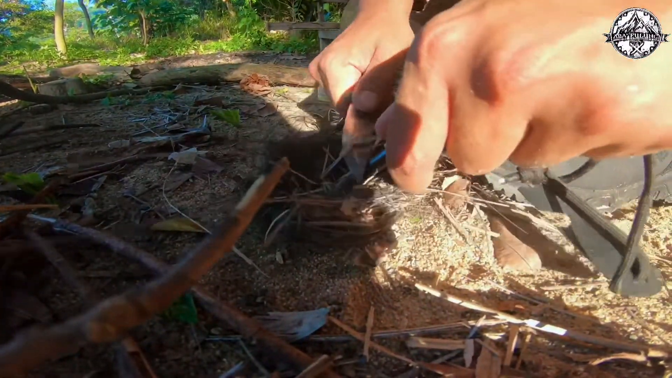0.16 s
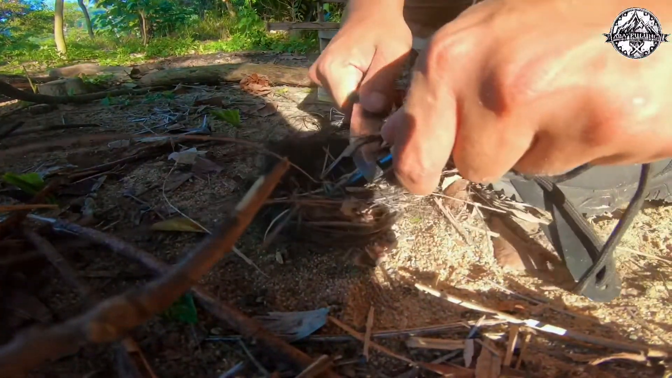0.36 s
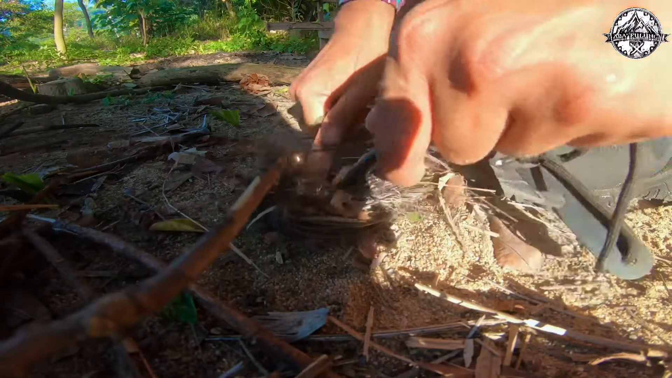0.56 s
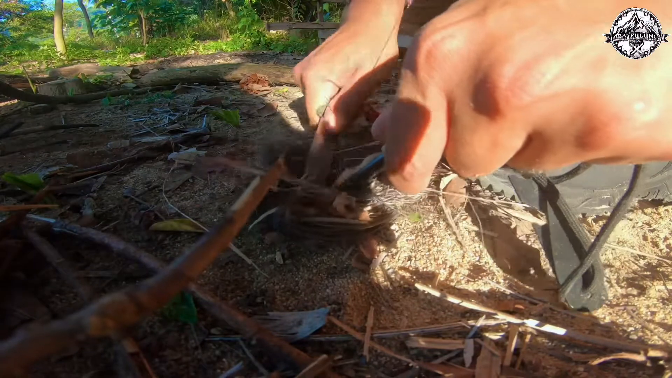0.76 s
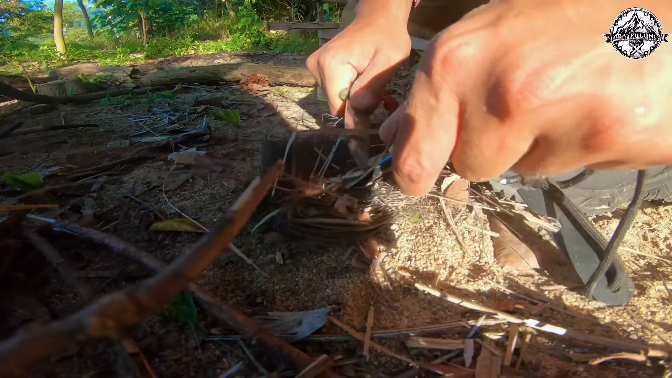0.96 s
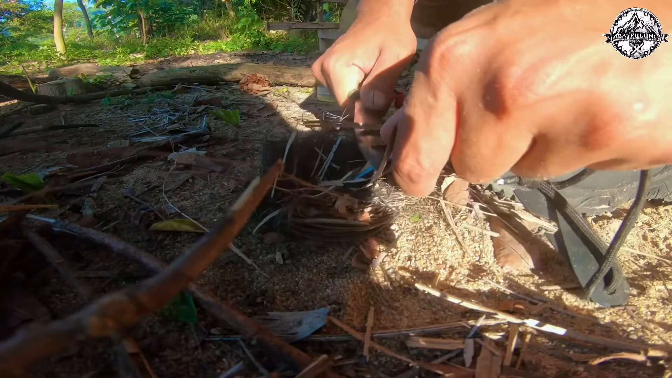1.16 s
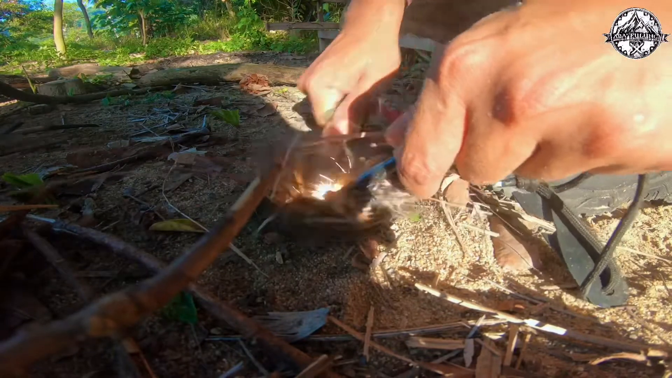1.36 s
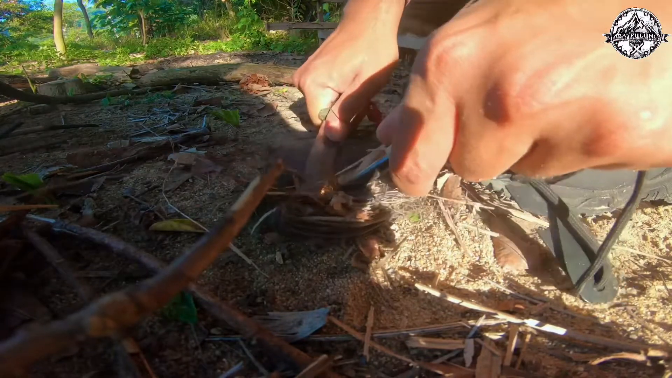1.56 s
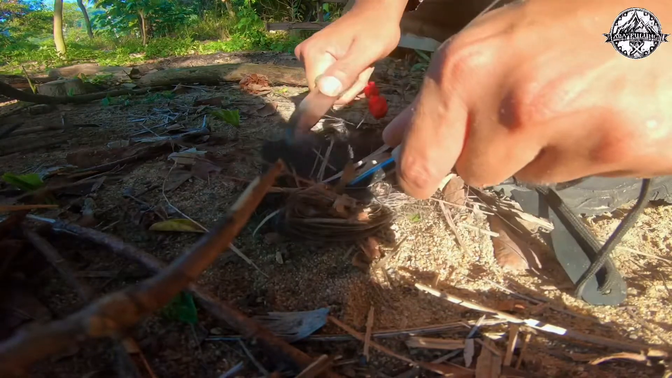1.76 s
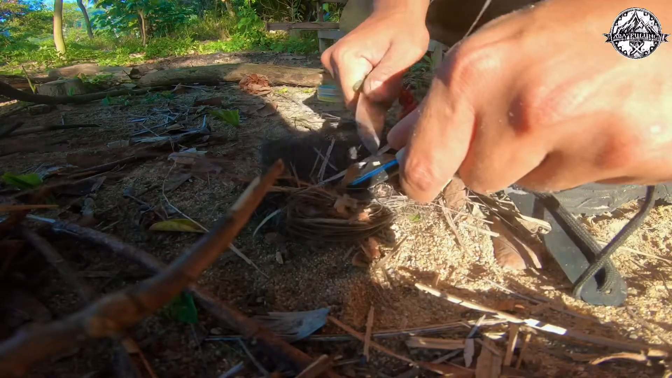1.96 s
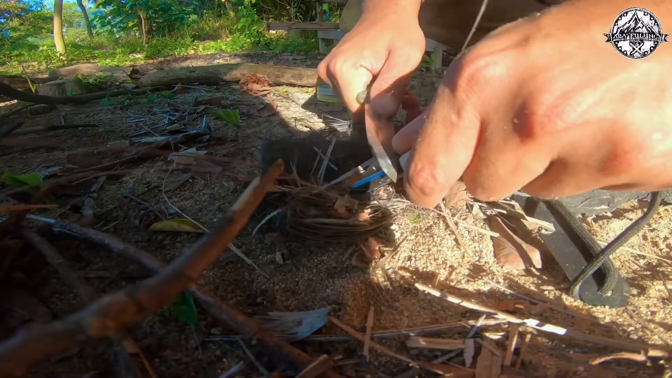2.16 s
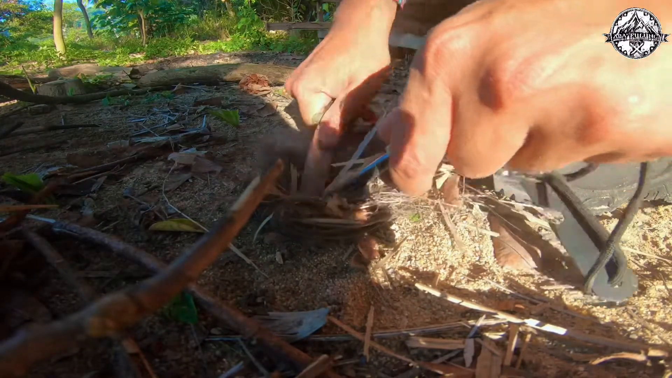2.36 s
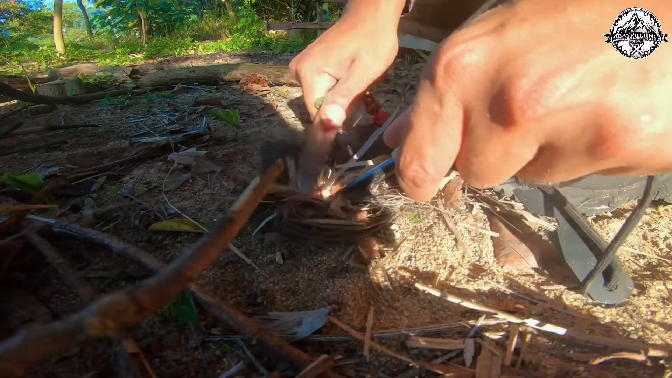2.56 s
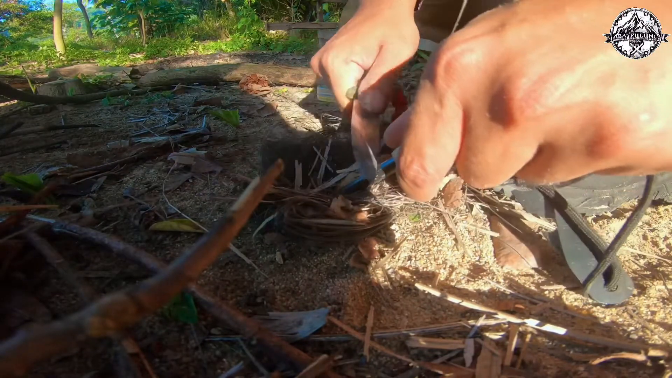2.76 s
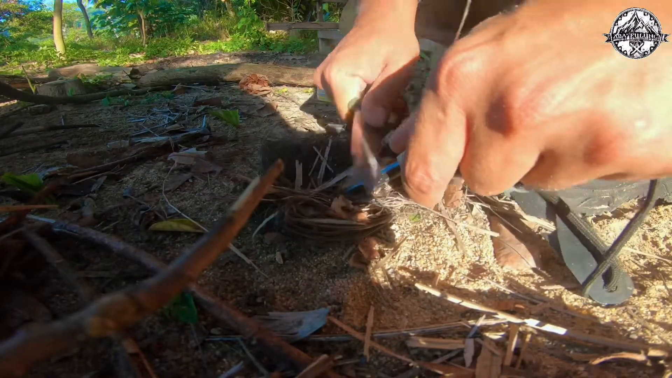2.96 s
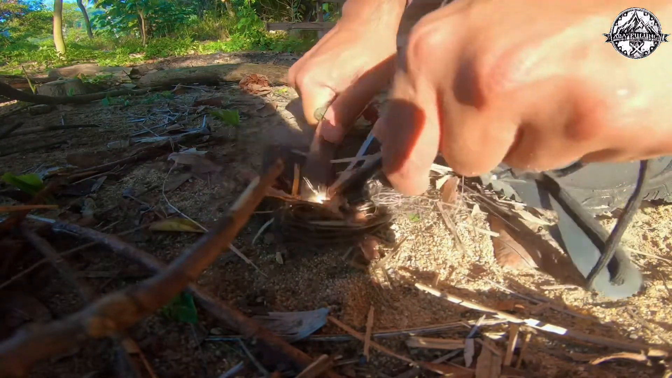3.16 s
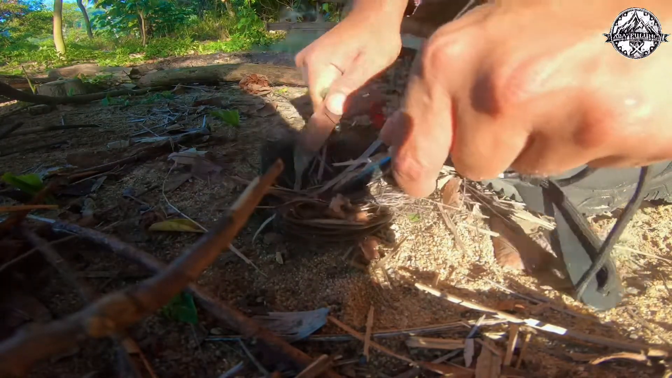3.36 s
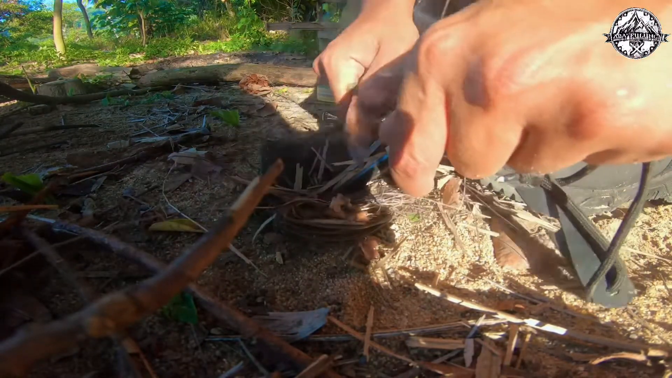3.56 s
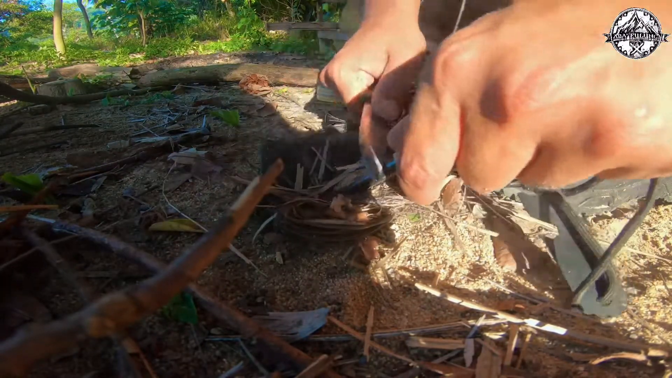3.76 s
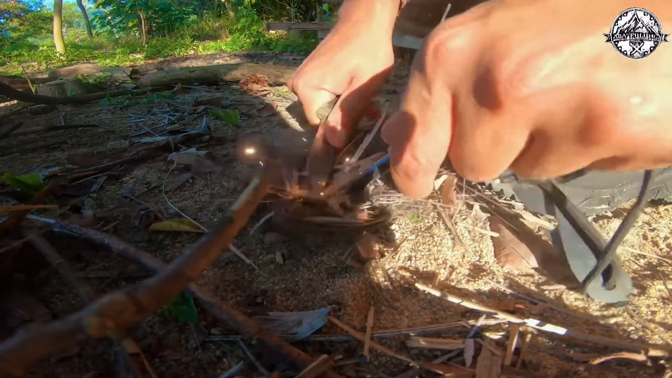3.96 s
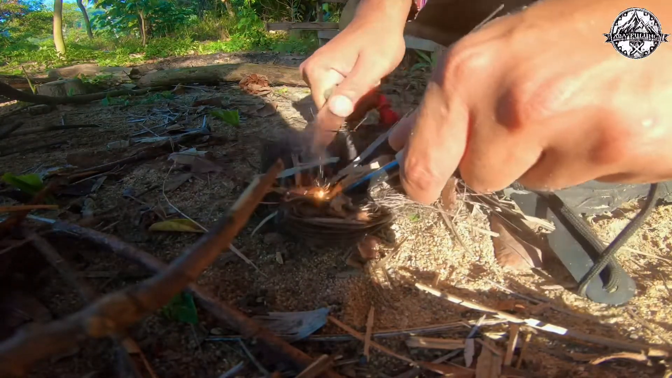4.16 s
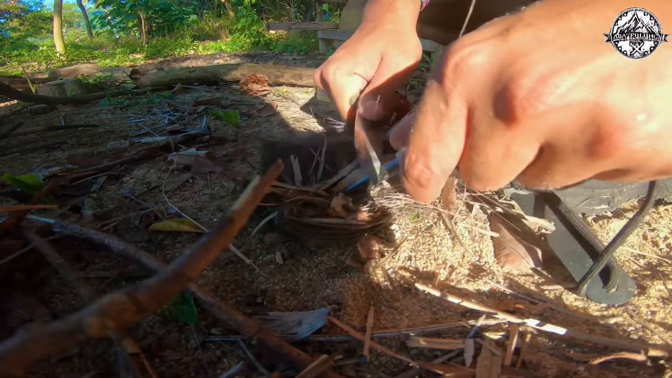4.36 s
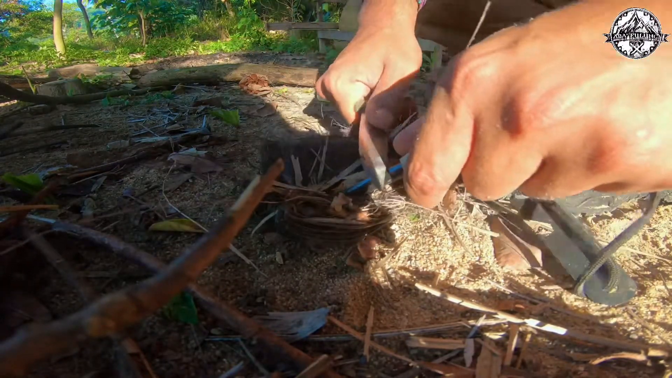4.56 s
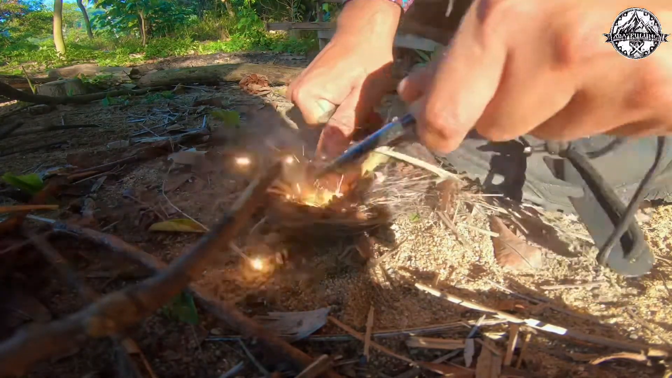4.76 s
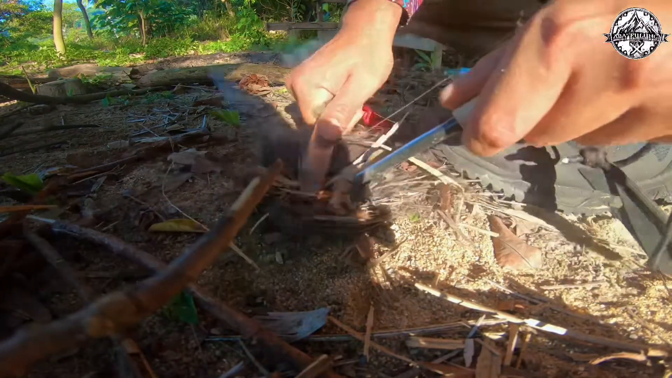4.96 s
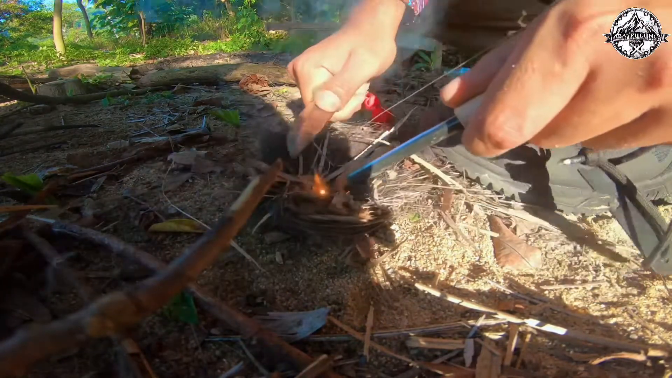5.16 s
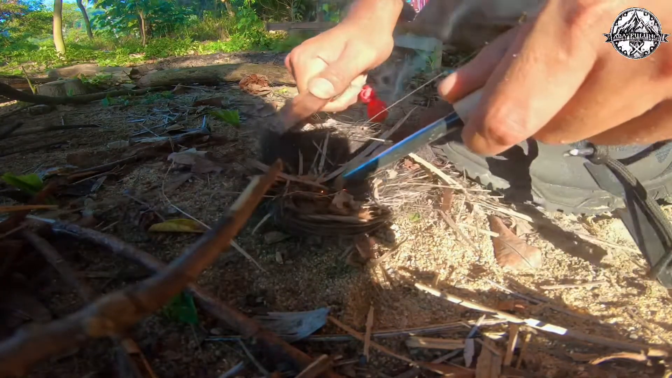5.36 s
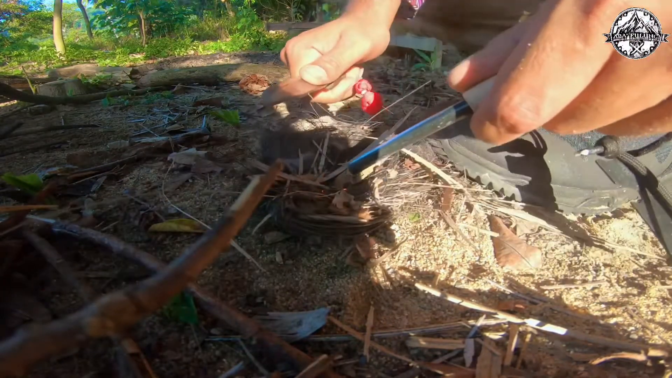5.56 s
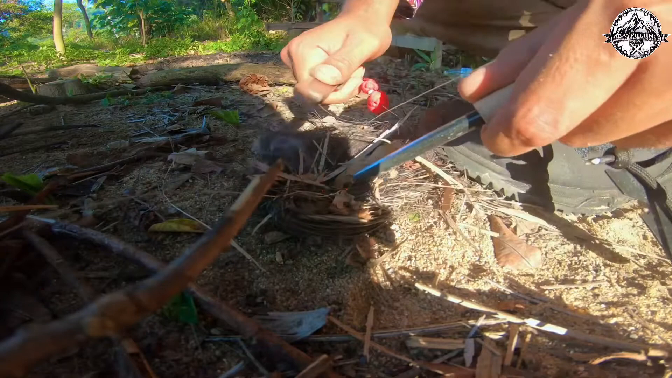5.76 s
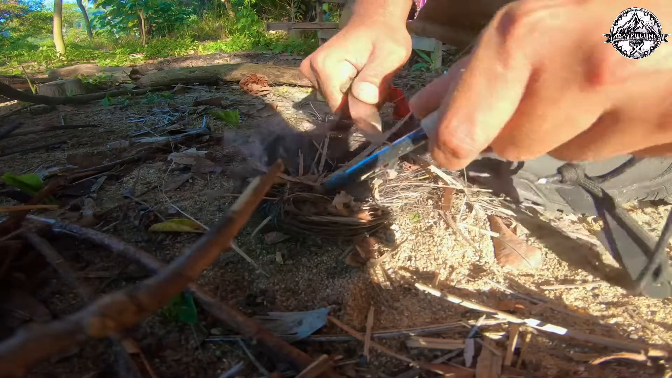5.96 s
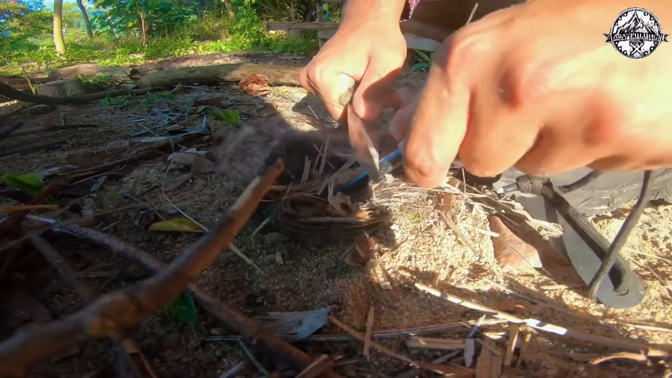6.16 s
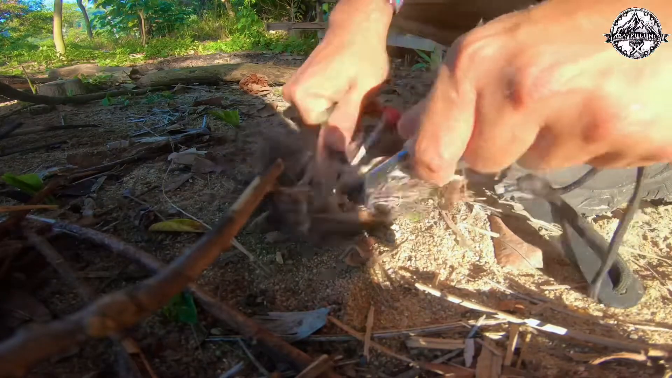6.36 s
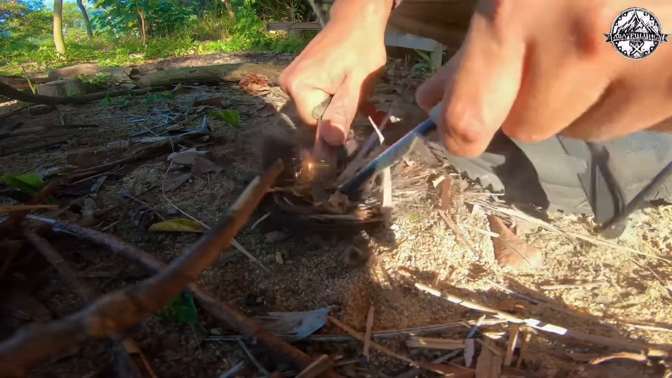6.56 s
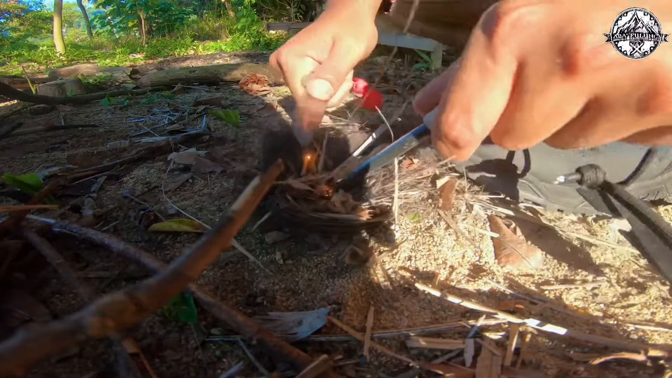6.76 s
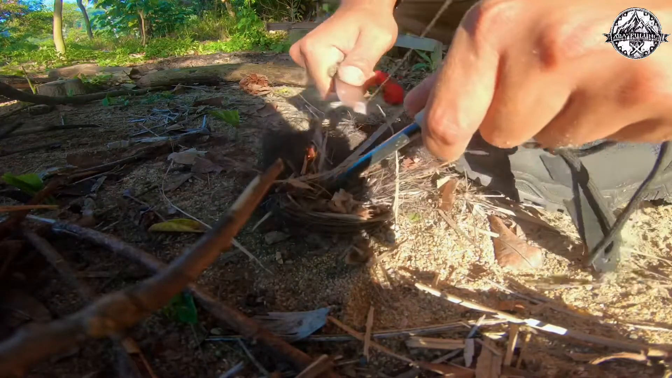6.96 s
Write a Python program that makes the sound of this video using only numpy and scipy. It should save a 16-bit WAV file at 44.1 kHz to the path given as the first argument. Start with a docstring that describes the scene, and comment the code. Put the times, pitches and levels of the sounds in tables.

```python
"""Scraping a ferro rod in a wood

A knife taps onto a ferro rod, rasps down it and bites with short squeals; the shavings spit and crackle.
Scrapes are trains of random fractures through a broad resonance; taps are damped steel modes,
squeals swept tones, bursts sharp clicks with debris, and knocks in the wood decaying sines.
Behind, tinder rustles in filtered fractures, a far engine drones in harmonic orders, one faint
tone whistles, and shaped noise gives the outdoor rumble and the hiss of insects."""
import sys
import numpy as np
from scipy import signal
from scipy.fft import rfft, irfft
from scipy.io import wavfile

SR = 44100
rng = np.random.default_rng(int(sys.argv[2]) if len(sys.argv) > 2 else 0)


def int16_out(signal):
    """Quantize to a 16-bit WAV file."""
    q = np.round(np.clip(np.atleast_2d(signal).T, -1, 1) * 32767)
    wavfile.write(sys.argv[1], SR, q.astype(np.int16))


N = 308700
TIME = np.arange(N) / SR  # seconds

# Sprays of shavings that rasp off and flare up: t/s, length/s, level/dB, body tilt/dB, fizz tilt/dB
FLARES = [(0.471, 0.037, -29, -2, -1.5), (0.554, 0.06, -32.5, -2.5, 2), (0.729, 0.03, -32, 2, 4),
          (0.767, 0.073, -28.5, -2, 3), (0.871, 0.048, -37, -2, 4), (1.353, 0.18, -35, 0.5, -1),
          (1.593, 0.016, -28, 0, 0), (1.638, 0.044, -35.5, 1, 3.5), (2.317, 0.016, -33, 1, 6),
          (2.427, 0.042, -35, 3, 7.5), (2.506, 0.0068, -24, 1.5, 5), (2.535, 0.039, -34, 0.5, -0.5),
          (2.98, 0.04, -23, 3.5, 4.5), (3.032, 0.099, -35.5, 4.5, 6.5), (3.79, 0.025, -27.5, 9.5, 4.5),
          (3.832, 0.051, -25.5, 2.5, 3.5), (3.909, 0.033, -29.5, 0.5, 3.5), (4.014, 0.017, -30.5, -6, -0.5),
          (4.038, 0.028, -25.5, 1.5, 0.5), (4.112, 0.028, -30.5, -0.5, -2), (4.623, 0.013, -23, 8, 2),
          (4.633, 0.059, -18, 2.5, 1.5), (4.723, 0.078, -31.5, 2.5, -1), (4.85, 0.061, -33.5, 0.5, -2),
          (4.942, 0.013, -31.5, -1, -0.5), (4.965, 0.075, -28.5, 3.5, 1), (5.058, 0.071, -40.5, 4, -3),
          (6.391, 0.023, -26, 2, 7), (6.427, 0.043, -30, -1.5, 2), (6.478, 0.051, -38.5, 7, 5),
          (6.574, 0.055, -27, -1, -2.5)]


def amp(db):
    """Level to amplitude: 20 dB is a factor of ten."""
    return 10 ** (np.asarray(db) / 20)


def unit(x):
    """Normalization of mean power: scales to rms 1."""
    return x / np.sqrt(np.mean(x ** 2) + 1e-20)


def read(points, hz):
    """Interpolation of a spectrum along a logarithmic frequency axis."""
    f, value = np.transpose(points)
    return np.interp(np.log(hz + 1), np.log(f + 1), value)


def bins(x):
    """Discrete Fourier analysis: the frequency of each bin of a sound, in Hz."""
    return np.fft.rfftfreq(x.shape[-1], 1 / SR)


def shaped(x, db):
    """Linear filtering as multiplication of the spectrum by a gain for each bin."""
    return irfft(rfft(x) * amp(db), x.shape[-1])


def add(mix, s, sound):
    """Superposition: adds a sound to the mix, in place, at a time in seconds."""
    part = mix[..., max(round(s * SR), 0):][..., :sound.shape[-1]]
    part += sound[..., :part.shape[-1]]


def wander(size, hz):
    """Low-pass noise: a smooth random course of rms 1 that hardly moves faster than hz."""
    noise = rng.standard_normal(size)
    return unit(irfft(rfft(noise) / (1 + (bins(noise) / hz) ** 4), size))


def air():
    """Interaural coherence: outdoor rumble, alike in both ears in the bass and mostly diffuse above."""
    # Spectrum of the rumble: f/Hz, density/dB (relative)
    rumble = [(13, -44.5), (22, -17.5), (86, -10), (134, -6.5), (169, -11), (241, -16.5), (305, -25),
              (661, -39), (1030, -41), (1400, -40), (1610, -37.5), (1730, -57.5), (2190, -52),
              (6000, -69.5), (7800, -92.5), (13200, -120)]
    # Likeness of the two ears: f/Hz, coherence (1 = identical)
    likeness = [(60, 0.89), (130, 0.96), (260, 0.95), (550, 0.26), (1200, 0.1), (2400, 0.4), (6000, 0.2)]
    left, other = shaped(rng.standard_normal((2, N)), read(rumble, bins(TIME)))
    same = np.clip(read(likeness, bins(TIME)), -1, 1)
    right = irfft(same * rfft(left) + np.sqrt(1 - same ** 2) * rfft(other), N)
    return amp(-40) * unit(np.array([left, right]))


def engine(hunt=0.01169, waver=0.55):
    """Harmonic orders of one shaft: a far drone, each order wavering on its way through the trees."""
    # Course of the drone: t/s, frequency of the sixth order before hunting f/Hz, level/dB
    course = [(0.0, 134, -37.5), (0.701, 144, -43.5), (2.401, 135, -38.5), (3.4, 136, -39.5),
              (4.0, 140, -33), (4.5, 141, -45.5), (5.6, 144, -35.5), (7.0, 140, -37.5)]
    # Orders: multiple of the shaft speed, level/dB (relative)
    orders = [(3, -33), (4, -8), (5, -4), (6, 5), (7, -11), (8, -31.5), (10, -12.5)]
    s, hz, db = np.transpose(course)
    hz = np.interp(TIME, s, hz) * (1 + hunt * wander(N, 2.445))  # hunt: rms share of the speed
    shaft = 2 * np.pi * np.cumsum(hz / 6) / SR
    drone = np.zeros(N)
    for multiple, order_db in orders:
        phase = multiple * shaft + rng.uniform(0, 2 * np.pi) + waver * wander(N, 8.5)
        drone += amp(order_db) * np.sin(phase) * (1 + 0.29 * wander(N, 6.1))
    return amp(np.interp(TIME, s, db)) * unit(drone)


def whistle(start_s=2.1, length_s=0.36, pitch_hz=1585, level_db=-59.5, waver=0.0053):
    """Frequency modulation: one faint, thin tone from far off, its pitch wavering slightly."""
    out, size = np.zeros(N), int(length_s * SR)
    phase = 2 * np.pi * np.cumsum(pitch_hz * (1 + waver * wander(size, 30))) / SR
    add(out, start_s, amp(level_db) * signal.windows.tukey(size, 0.3) * np.sin(phase))
    return out


def insects(start_db=-44.5, full_db=-39.5, swell_s=4.0, shimmer_db=0.6959, lean_db=0.3):
    """Incoherent summation: a diffuse chorus merges into one high, shimmering hiss that swells, then holds."""
    # Spectrum of the chorus: f/Hz, density/dB (relative)
    chorus = [(5500, -31), (7000, -24), (7800, -11.5), (8400, -5), (9300, -1), (9800, -3), (10200, -19),
              (10600, -33)]
    hiss = unit(shaped(rng.standard_normal((2, N)), read(chorus, bins(TIME))))
    db = np.interp(TIME, [0, swell_s], [start_db, full_db]) + shimmer_db * wander(N, 30)
    return hiss * amp([db + lean_db, db - lean_db])


def scatter(x, decay_s, db, size=16384):
    """Diffuse reflection: convolution with decaying noise, different for each ear."""
    t = np.arange(size) / SR
    tail = rng.standard_normal((2, size)) * np.exp(-t / decay_s) * (1 - np.exp(-2 * t / decay_s))
    return amp(db) * signal.oaconvolve(x[None], tail / np.linalg.norm(tail[0]), axes=1)[:, :N]


def hands(x, shared_db=-10, apart_db=-11, reach_s=0.0018, count=5, size=256):
    """Comb filtering: moving hands throw back close echoes, new for each sound, partly different for each ear."""
    x = np.pad(x, (0, size))
    delay = reach_s * rng.uniform(0.1, 1, (3, count, 1))
    sign = rng.choice([-1, 1], delay.shape)
    echoes = (sign * np.exp(-2j * np.pi * delay * bins(x))).sum(1) / np.sqrt(count)
    paths = 1 + amp(shared_db) * echoes[0] + amp(apart_db) * echoes[1:]
    heard = irfft(rfft(x) * paths, len(x))
    return heard * np.sqrt(np.mean(x ** 2) / np.mean(heard ** 2))


def grain(body_db=0, fizz_db=0, ring_hz=3000, ring_db=0, size=1024):
    """Minimum-phase impulse response: the click of one shaving torn off, with a broad ring."""
    # Colour of the rasp: f/Hz, density/dB (relative)
    colour = [(150, -2.5), (300, -3.5), (450, -3.5), (700, -5), (950, -4), (1350, -8), (1700, -5.5),
              (2400, -1.5), (3100, -0.5), (4200, -7.5), (5400, -13), (7800, -14), (10200, -31),
              (13000, -89)]
    sizzle_hz, sizzle_db = 8740, -17
    hz = np.fft.rfftfreq(size, 1 / SR)
    sizzle = amp(sizzle_db) / (1 + ((hz - sizzle_hz) / 1500) ** 2) * hz / sizzle_hz
    db = 20 * np.log10(np.hypot(amp(read(colour, hz)), sizzle) + 1e-5)
    # body tilts the low end, fizz the high end
    db = db + read([(1100, body_db), (2400, 0)], hz) + read([(3800, 0), (5800, fizz_db)], hz)
    db = db + ring_db / (1 + ((hz / ring_hz - 1) / 0.16) ** 2)
    log_gain = np.log(amp(np.r_[db, db[-2:0:-1]]))
    # the Hilbert transform of the log gain gives the phase that makes the click causal
    click = np.fft.ifft(np.exp(np.conj(signal.hilbert(log_gain)))).real[:size // 2]
    return -click / np.linalg.norm(click)


def fractures(size, per_s, spread_db, smooth):
    """Random point process: tiny breaks of uneven size over the smooth hiss of sliding steel; rms 1."""
    chance, strength = rng.random(size), np.minimum(rng.exponential(1, size), 3.5)
    breaks = (chance < per_s / SR) * amp(spread_db * strength)
    return unit(unit(breaks - breaks.mean()) + smooth * rng.standard_normal(size))


def rustle(restless_db=-62.5, clump_db=2.5):
    """Amplitude-modulated fractures: faint crackle of dry tinder, louder whenever the hands shift."""
    # Shifts of the hands, swelling and fading: t/s at the height, length/s, level/dB before clumping
    shifts = [(0.0, 0.086, -43), (0.107, 0.11, -47.5), (0.722, 0.06, -46), (3.206, 0.16, -53),
              (3.339, 0.083, -44.5), (4.511, 1, -58.5), (6.071, 0.51, -51.5), (6.916, 0.4, -54.5)]
    moving = np.zeros(N)
    for s, length, db in shifts:
        moving += amp(db) * np.cos(np.pi * np.clip((TIME - s) / length, -0.5, 0.5))
    # the tinder never lies quite still
    level = np.hypot(amp(restless_db), moving) * amp(clump_db * wander(N, 25))
    drive = fractures(N, per_s=2200, spread_db=-1, smooth=0.63) * level
    return signal.oaconvolve(drive, grain(body_db=0.5, fizz_db=5.5))[:N]


def thumps(decay_s=0.0066, dead_hz=821.3, dead_s=0.00065, size=4096):
    """Damped free vibration: the stroke's push shoves the wood, a short low pulse with a dead knock on top."""
    # Pushes into the wood: t/s, level of the pulse/dB, f/Hz, knock relative to the pulse/dB
    pushes = [(0.426, -16, 80.5, -9), (1.317, -16.5, 75, -17), (1.6337, -24.5, 175, 10.5),
              (2.208, -17, 136, -4), (2.5126, -28, 228, 15), (3.002, -25, 162, -8),
              (3.782, -11.5, 95.2, -24), (3.936, -19, 180, 12), (4.64, -20, 118, -9), (4.678, -14, 104, -1),
              (6.321, -15, 104, -19)]
    out, t = np.zeros(N), np.arange(size) / SR
    for s, db, hz, knock_db in pushes:
        pulse = np.sin(2 * np.pi * hz * t) * np.exp(-t / decay_s)
        knock = amp(knock_db) * np.sin(2 * np.pi * dead_hz * t) * np.exp(-t / dead_s)
        add(out, s, amp(db) * (pulse + knock))
    # the pulses carry no deep bass below about 45 Hz
    return signal.sosfilt(signal.butter(2, 45, "highpass", fs=SR, output="sos"), out)


def taps(skid=0.028, skid_s=0.0032, size=1024):
    """Modal impact: steel meets the rod with a dry tick, skids for an instant and excites its damped modes."""
    # Blade set on the rod: t/s, level/dB
    contacts = [(1.0028, -12), (2.01, -5.5), (2.6802, -6.5), (3.5407, -7), (4.2676, -14), (5.9585, -3.5)]
    # Modes of blade and rod, damped by the hands: f/Hz before detuning, level/dB (relative), t60/s before the cap
    modes = [(1254, 8.5, 0.027), (2810, 0, 0.014), (3310, 8, 0.0255), (4235, 1.5, 0.011),
             (5700, -6.5, 0.015), (6260, -35, 0.0063), (8342, -18, 0.0077), (8900, 2, 0.024)]
    out, t = np.zeros((2, N)), np.arange(size) / SR
    hz, mode_db, t60 = np.transpose(modes)[:, :, None]
    decay = amp(mode_db - 60 * t / np.minimum(t60, 0.009))  # no mode rings longer than 9 ms
    for s, db in contacts:
        # the grip shifts the modes a little each time
        detune, phase = 1 + 0.05 * rng.standard_normal(hz.shape), rng.random(hz.shape)
        ring = (decay * np.sin(2 * np.pi * (hz * detune * t + phase))).sum(0)
        contact = (t == 0) + skid * rng.standard_normal(size) * np.exp(-t / skid_s)
        tick = np.convolve(contact, grain(body_db=-3.5, fizz_db=5.0, ring_hz=3970, ring_db=7.5))[:size]
        tap = unit(tick) + 0.35 * unit(ring)
        tap = np.tanh(2 * tap / abs(tap).max())  # the contact yields a little at the height of the blow
        add(out, s, amp(db) * hands(tap))
    return out


def squeals(jitter=0.13, jitter_hz=1400, rough_db=2, edge=0.21, lean_db=2.0):
    """Frictional self-oscillation: the edge chatters at a rough pitch that arches with the speed of the blade."""
    # Bites that chatter: t/s, length/s, level before the lean/dB,
    # start f/Hz, top f/Hz, end f/Hz (all before jitter), share of the length before the top
    chatters = [(0.416, 0.015, -13, 3150, 4920, 2806, 0.11), (1.308, 0.011, -12.5, 2870, 5200, 3500, 0.53),
                (2.2235, 0.013, -16, 2596, 3700, 2730, 0.55), (3.7696, 0.017, -23, 2200, 5790, 5400, 0.73),
                (4.594, 0.0142, -24, 2270, 3039, 2296, 0.373), (6.308, 0.006, -24.5, 1720, 3360, 2930, 1)]
    out = np.zeros((2, N))
    for s, length, db, start_hz, top_hz, end_hz, turn in chatters:
        size = int(length * SR)
        turns = [0, np.clip(turn, 0, 1), 1]
        hz = np.interp(np.linspace(0, 1, size), turns, [start_hz, top_hz, end_hz])
        phase = 2 * np.pi * np.cumsum(hz * (1 + jitter * wander(size, jitter_hz))) / SR
        tone = np.sin(phase) + amp(-22.5) * np.sin(2 * phase)
        chatter = tone * amp(rough_db * wander(size, 900))
        squeal = unit(chatter * signal.windows.tukey(size, edge))
        add(out, s, amp(db) * hands(squeal, shared_db=-16.0))
    return out * amp([[lean_db], [-lean_db]])


def spits(per_s=17, over_db=10.5, spread_db=2, debris_s=0.0011, count=6):
    """Bernoulli trials: small shavings burst by chance during a flare; rows of t/s, peak/dB, debris decay/s."""
    bursts = []
    for s, length, db, *_ in FLARES:
        for chance, place, strength in rng.random((count, 3)):
            if chance < per_s * length / count:
                peak_db = db + over_db + spread_db * (2 * strength - 1)
                bursts.append((s + place * length, peak_db, debris_s))
    return bursts


def snaps(debris=0.11, size=1500):
    """Impulsive fracture: a shaving bursts in one sharp crack, then its crackling debris dies away."""
    # Bursts of large shavings: t/s, peak/dB, decay of the debris/s
    large = [(0.4921, -23, 0.001), (0.5284, -11, 0.00044), (0.5802, -18, 0.0022), (0.7348, -10.5, 0.0044),
             (0.7844, -13.5, 0.0065), (0.822, -8, 0.0028), (0.8764, -11.5, 0.001), (0.917, -15, 0.0012),
             (1.2878, -19, 0.0007), (1.5253, -23, 0.002), (1.603, -8.5, 0.0055), (1.6344, -4.5, 0.0016),
             (2.1952, -21.5, 0.001), (2.462, -18, 0.0012), (2.5126, -7, 0.0031), (3, -8, 0.0023),
             (3.0335, -11, 0.0034), (3.747, -11.5, 0.00098), (3.8448, -6, 0.00089), (3.8599, -15, 0.001),
             (3.9317, -9, 0.00091), (4.044, -8, 0.0023), (4.5996, -16, 0.023), (4.8574, -4.5, 0.00161),
             (4.8907, -12.5, 0.0013), (6.447, -6, 0.00082), (6.573, -15, 0.00107)]
    out, t = np.zeros((2, N)), np.arange(size) / SR
    click = grain(body_db=-0.5, fizz_db=-2.5)
    for s, db, debris_s in large + spits():
        bits = debris * fractures(size, per_s=4000, spread_db=3.0, smooth=1.0) * np.exp(-t / debris_s)
        crack = hands(np.convolve((t == 0) + bits, click))
        add(out, s, amp(db) * crack / abs(crack).max())
    return out


def rasp(length, rise, fall, db, body_db, fizz_db, clump_db=1.75, clump_hz=260, ring_db=7, count=4):
    """Stick-slip friction: the blade catches at once, swells, sags and lets go; shavings come in clumps."""
    catch_s, catch_db, sag_db = 0.002, -10.5, -3.5
    slip_db, slip_hz = 1.57, 50  # the blade sticks and slips unevenly
    t = np.arange(0, length + 3 * fall, 1 / SR)
    swell_db = catch_db * np.maximum(1 - t / rise, 0) + sag_db * (np.minimum(t / length, 1) - 0.5)
    release_db = -20 * np.maximum((t - length) / fall, 0) ** 0.67  # 20 dB in the fall time
    force = np.minimum(t / catch_s, 1) * amp(swell_db + release_db)
    speed = amp(0.49 * (db + 28.5))  # a harder stroke tears off more grains a second, and more evenly
    hiss = 0.47 + np.clip(-body_db / 8, 0, 1)  # thin strokes are sliding steel, full ones are sparks
    uneven_db = clump_db * wander(len(t), clump_hz) + slip_db * wander(len(t), slip_hz)
    grip = force * amp(uneven_db / np.sqrt(max(speed, 1)))
    spray = 0
    # shavings of several sizes, each with its own ring
    for ring_hz in np.geomspace(1500, 5200, count) * rng.uniform(0.8, 1.25, count):
        drive = grip * fractures(len(t), per_s=520 * speed, spread_db=4, smooth=hiss)
        torn = signal.fftconvolve(drive, grain(body_db, fizz_db, ring_hz, ring_db))
        side_db = rng.uniform(-0.38, 0.56) * np.array([[1], [-1]])  # sparks fly to either side
        spray = spray + amp(side_db) * hands(torn)
    return amp(db) * spray * np.linalg.norm(force) / np.linalg.norm(spray.mean(0))


def flares(rise_s=0.014, fall_s=0.035, linger=0.4):
    """Granular radiation: sprays of shavings catch light and sizzle out, longer ones dying more slowly."""
    out = np.zeros((2, N))
    for s, length, db, body_db, fizz_db in FLARES:
        add(out, s, rasp(length, rise_s, fall_s + linger * length, db, body_db, fizz_db))
    return out


def strokes():
    """Friction in three phases: each stroke is a thin slide, a hard bite and a dying trail of sparks."""
    # Strokes down the rod: t/s, time to the bite/s, slide level/dB,
    # bite length/s, bite level/dB, body tilt of the bite/dB, trail level/dB
    passes = [(0.388, 0.023, -27, 0.012, -21.5, -3, -34.5), (1.277, 0.021, -22.5, 0.012, -15.5, -5, -37),
              (2.181, 0.028, -24.5, 0.025, -21, 1, -38), (2.908, 0.028, -29, 0.023, -20.5, -2.5, -32),
              (3.74, 0.029, -27, 0.014, -19, -6.5, -31.5), (4.557, 0.033, -26.5, 0.013, -20.5, -1, -33),
              (6.278, 0.028, -27.5, 0.017, -20.5, -4.5, -36.5)]
    bite_rise = 0.0057  # seconds, shared by the trail
    out = np.zeros((2, N))
    for s, slide_s, slide_db, bite_s, bite_db, body_db, trail_db in passes:
        # bare steel sounds thin
        slide = rasp(slide_s, rise=0.016, fall=0.013, db=slide_db, body_db=-7.5, fizz_db=1.5)
        bite = rasp(bite_s, bite_rise, fall=0.016, db=bite_db, body_db=body_db, fizz_db=0.5)
        trail = rasp(0.051, bite_rise, fall=0.064, db=trail_db, body_db=1, fizz_db=5.5)
        add(out, s, slide)
        add(out, s + slide_s, bite)
        add(out, s + slide_s + bite_s, trail)
    return out


def scene():
    """Direct and reflected sound: the work sits a little to the left; the ground reflects it, the trees hardly."""
    # Lead of the left ear over the right: f/Hz, level difference/dB
    left_lead = [(300, 1.5), (600, 1.5), (1060, 5.5), (1900, 4), (3100, 0), (4400, 1.5), (6000, 5),
                 (10000, 1.5)]
    background = air() + engine() + whistle() + insects()
    work = rustle() + taps() + squeals() + snaps() + flares() + strokes()
    lead_db = read(left_lead, bins(work)) / 2
    direct = shaped(work, np.array([lead_db, -lead_db]))
    ground = scatter(work.mean(0), decay_s=0.002, db=-18)
    trees = scatter(work.mean(0), decay_s=0.04, db=-24)
    return background + thumps() + direct + ground + trees


def record(dry):
    """Saturation and band limiting: the loudest peaks are rounded off, then the top is cut steeply."""
    held = dry / (1 + (dry / 0.85) ** 6) ** (1 / 6)
    low_pass = signal.firwin(301, 10350, window=("kaiser", 7), fs=SR)  # cutoff in Hz
    return signal.oaconvolve(held, low_pass[None], "same")


dry = scene()
out = record(dry)
int16_out(out)
```